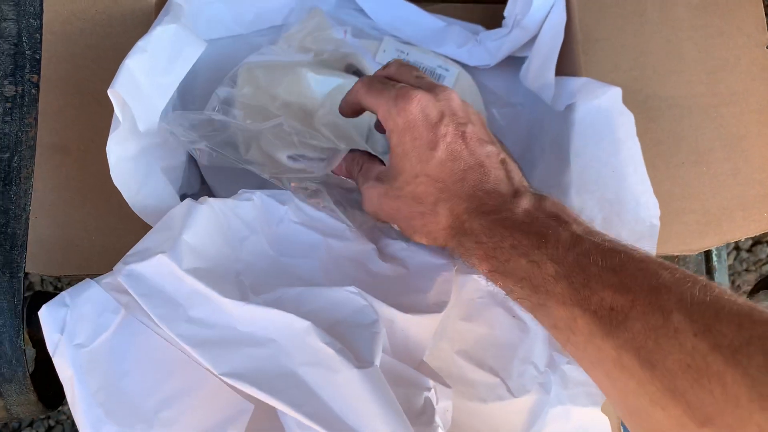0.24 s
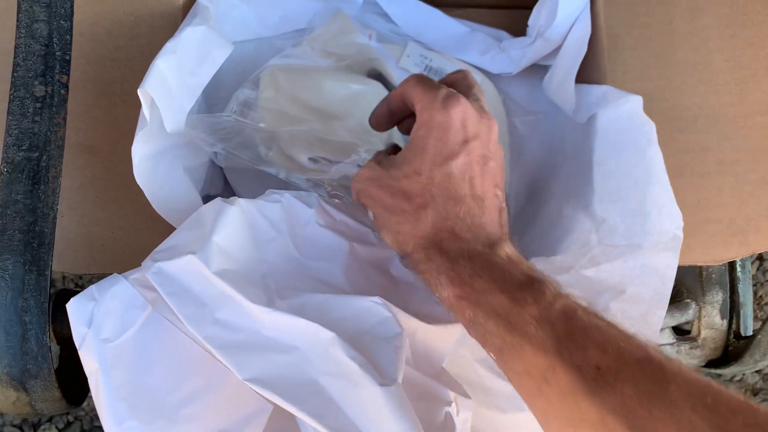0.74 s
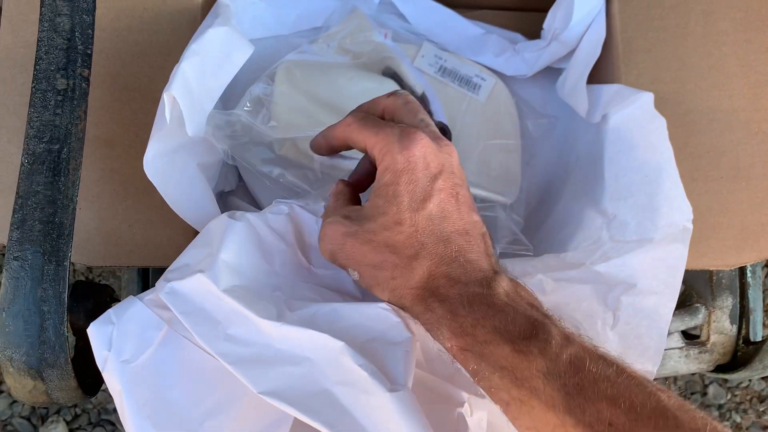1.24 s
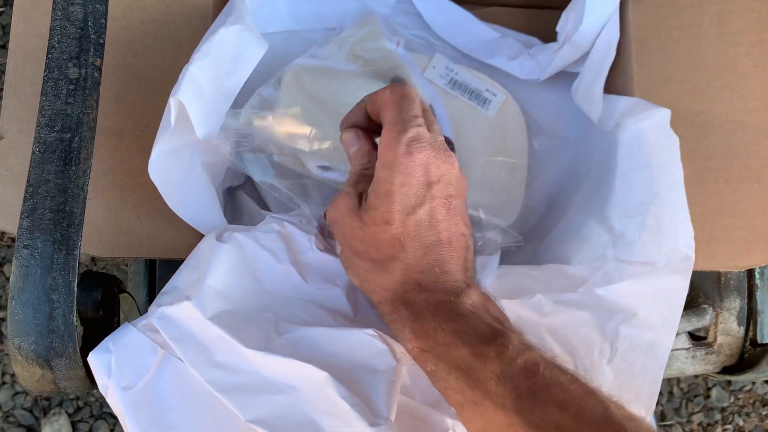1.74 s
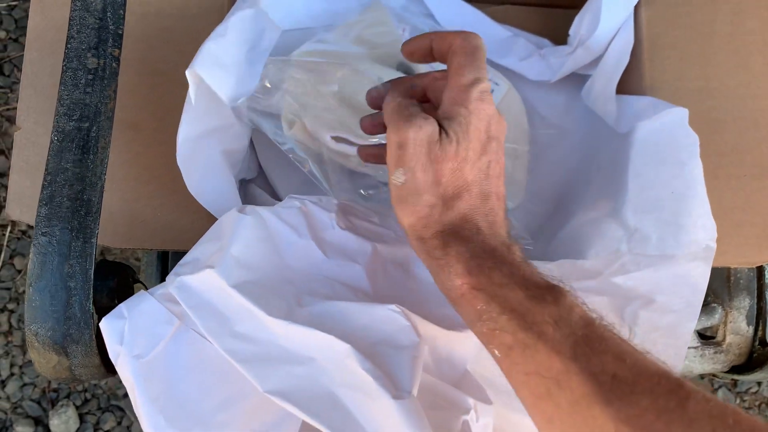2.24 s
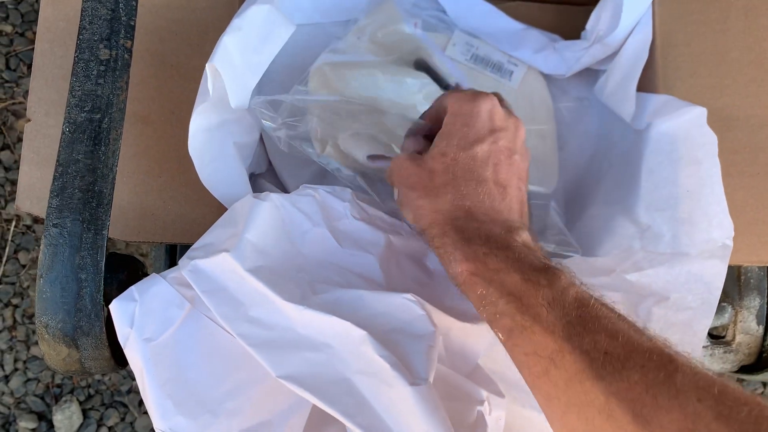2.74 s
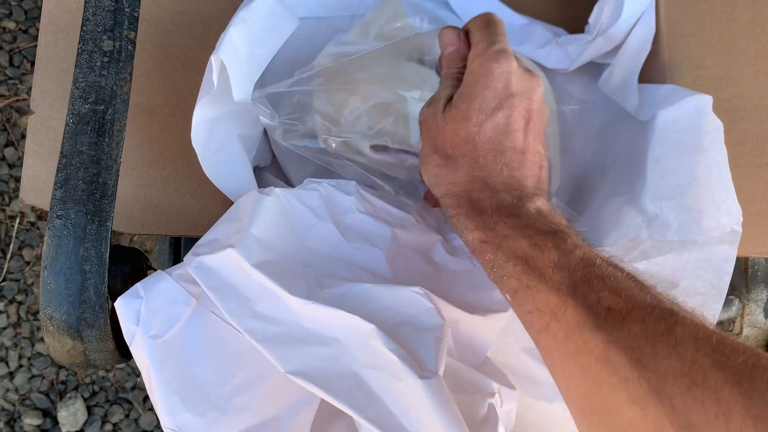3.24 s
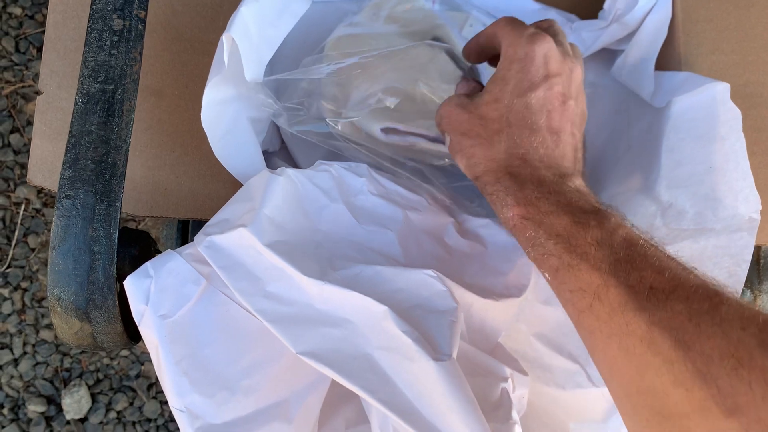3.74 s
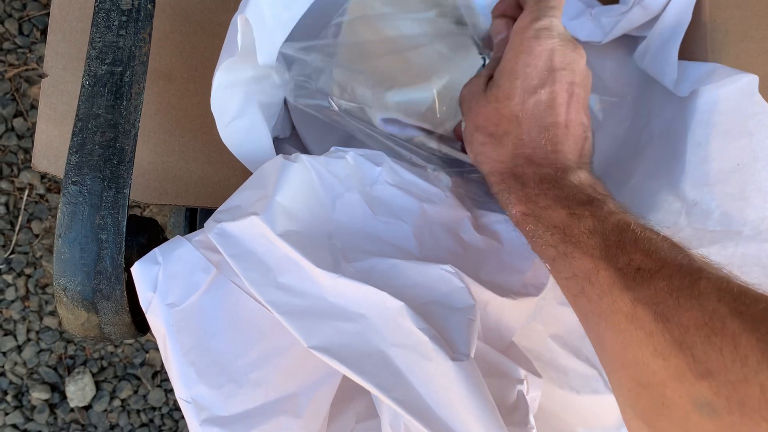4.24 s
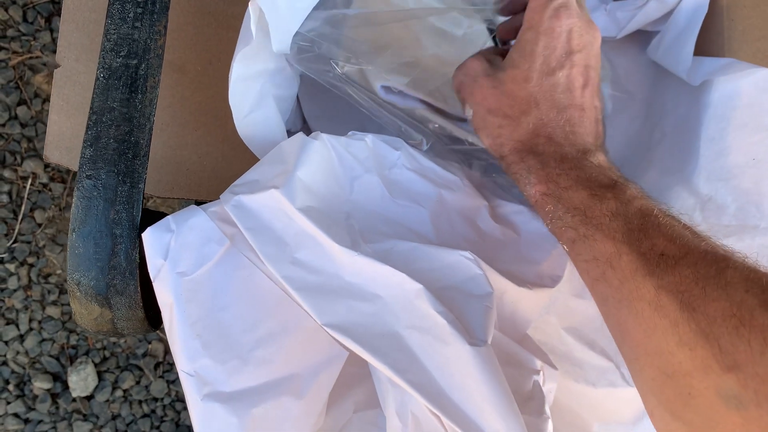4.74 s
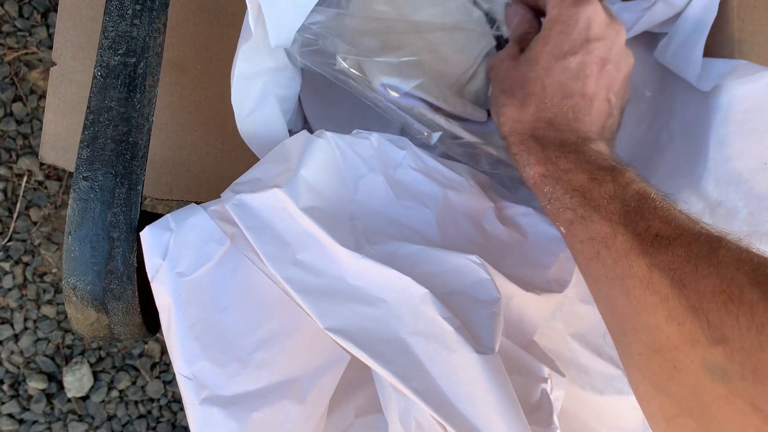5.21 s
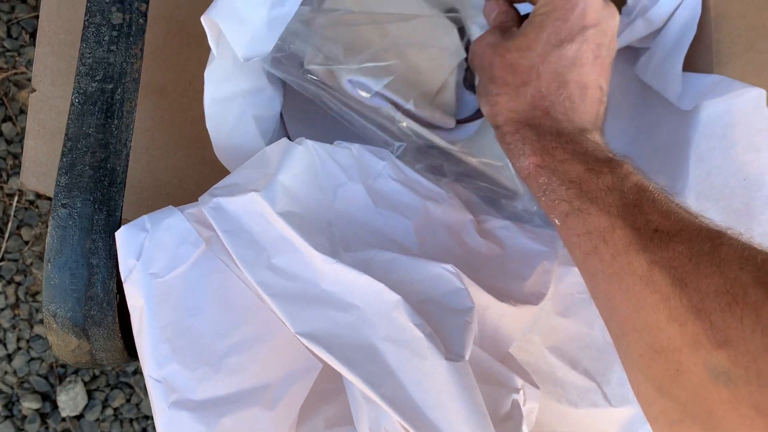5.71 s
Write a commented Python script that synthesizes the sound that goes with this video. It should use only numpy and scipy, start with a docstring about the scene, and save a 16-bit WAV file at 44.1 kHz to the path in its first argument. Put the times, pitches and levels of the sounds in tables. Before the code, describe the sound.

Close stereo sound of a hand handling a thin plastic bag nested in tissue paper inside a cardboard box. Sparse sharp snaps come first, then dense crackling bursts near 1.6, 2.8 and 4.1 seconds, with fine crinkles between. Soft box bumps gather around 2 seconds. Later, paper rubs and tiny film pops join thinner snaps. Faint outdoor air and low rumble lie beneath.

```python
"""A hand rummages in a cardboard box outdoors, over a faint rumble and hiss of air (shaped noise).
A few snaps of a thin plastic bag in tissue paper come first: each is a short grain of coloured noise.
Dense snaps and running slips follow near 1.6, 2.8 and 4.1 s, with tiny crinkles of film and paper between.
Soft box bumps (short low swings) gather near 2 s, as the bag slides over the tissue with an even hiss.
After 4.3 s come most of the paper rubs (noise at a falling pitch) and film pops (tiny fading tones)."""
import sys
import numpy as np
from scipy import signal
from scipy.fft import rfft, irfft, next_fast_len
from scipy.io import wavfile
from scipy.ndimage import map_coordinates

SR = 44100
rng = np.random.default_rng(int(sys.argv[2]) if len(sys.argv) > 2 else 0)


def persist_wave(psi):
    """Save psi, clipped to +-1, as 16-bit WAV."""
    counts = np.round(np.clip(psi, -1, 1) * 32767).astype(np.int16)
    wavfile.write(sys.argv[1], SR, np.atleast_2d(counts).T)


N = 263277
TIME = np.arange(N) / SR
PADDED = next_fast_len(N + 8192, real=True)  # room for filters to ring out
GRAIN = 1024  # samples in one crease sound


def from_db(db):
    """Turn decibels into gain."""
    return 10 ** (np.asarray(db) / 20)


def rms_one(x):
    """Scale each row to an average power of 1."""
    power = np.mean(x ** 2, axis=-1, keepdims=True)
    return x / np.sqrt(power + 1e-20)


def in_time(rows, when=TIME):
    """Read each column of a time table at the given times, joining its points by straight lines."""
    s, *columns = np.transpose(rows)
    return [np.interp(when, s, column) for column in columns]


def slow_chance(per_s):
    """Draw random values at a steady rate and join them by straight lines."""
    return np.interp(TIME * per_s, np.arange(GRAIN), rng.standard_normal(GRAIN))


def frequencies(size):
    """List the frequencies of a transform in Hz, none below 1."""
    return np.maximum(np.fft.rfftfreq(size, 1 / SR), 1)


def over_hz(points, size):
    """Join a frequency table by straight lines on a log-frequency axis."""
    hz, value = np.transpose(points)
    return np.interp(np.log(frequencies(size)), np.log(hz), value)


# how alike left and right are: (frequency [Hz], likeness [0 to 1])
LIKENESS = [(60, .92), (200, .98), (700, .94), (1500, .84), (2500, .72), (4000, .4), (7000, .4),
            (9000, .82), (15000, .82)]


def vibration(noise, gain, size):
    """Colour two noises into a stereo pair, with minimum phase so that nothing sounds early."""
    cepstrum = irfft(np.log(gain + 1e-9), size)[..., :size // 2]
    cepstrum[..., 1:] *= 2
    colour = np.exp(rfft(cepstrum, size))
    alike = np.clip(over_hz(LIKENESS, size), 0, 1)
    shared, apart = rfft(noise, size)
    shared = np.sqrt((1 + alike) / 2) * shared
    apart = np.sqrt((1 - alike) / 2) * apart
    return irfft(np.array([shared + apart, shared - apart]) * colour, size)


def hiss(level_db, spectrum):
    """Make smooth stereo noise of one colour that follows a level."""
    noise = rng.standard_normal((2, N)) * from_db(level_db)
    gain = rms_one(from_db(over_hz(spectrum, PADDED)))
    return vibration(noise, gain, PADDED)[:, :N]


def fold_resonances(count, order=44):
    """Give every fold its own random peaks and dips in dB, closer together in the bass."""
    place = np.sqrt(np.linspace(0, 1, GRAIN // 2 + 1)) * (order - 1)
    tents = np.maximum(1 - abs(place - np.arange(order)[:, None]), 0)
    return rng.standard_normal((count, order)) @ tents


# pinches and tugs of the fingers: (start [s], end [s], crinkling film level [dB],
# tissue paper level [dB], lesser snaps level [dB])
PULLS = [(0.037, 0.068, -42.5, -45.5, -39), (0.294, 0.385, -43.5, -47.5, -37),
         (0.456, 0.483, -40.5, -43, -39.5), (1.272, 1.352, -45, -48, -36), (1.599, 1.672, -38.5, -37, -33),
         (1.691, 1.825, -37, -40, -31), (1.928, 2.05, -40.5, -43.5, -43), (2.387, 2.494, -47, -49, -45),
         (2.738, 2.764, -37, -40, -43), (2.769, 2.851, -40, -34, -35), (2.86, 2.909, -41, -41, -40),
         (3.101, 3.167, -43.5, -43.5, -37), (3.268, 3.311, -41, -41, -33), (3.99, 4.03, -42, -45.5, -45),
         (4.041, 4.106, -29.5, -39, -30), (4.124, 4.248, -35, -40.5, -34.5),
         (4.403, 4.514, -42, -44.5, -39), (5.052, 5.138, -45, -49.5, -40), (5.295, 5.36, -42.5, -45.5, -37),
         (5.525, 5.62, -41, -46, -35)]
# effort of the hand holding the bag between pulls: (time [s], crinkling film level [dB])
HOLD = [(0, -48), (0.45, -48), (0.72, -56), (1.2, -54), (1.5, -49), (2.12, -45), (2.3, -50), (2.66, -51),
        (2.8, -43), (2.97, -44), (3.46, -56), (3.9, -52), (4.3, -44), (4.62, -45.5), (4.78, -56),
        (4.98, -53.5), (5.15, -45), (5.86, -44.5), (5.91, -54.5), (5.97, -43)]
ATTACK_S, RELEASE_S = 0.0088, .028  # time constants of a pull
USUAL_EFFORT_DB = -45
TISSUE_DB, TISSUE_FOLLOWS = -48.5, 0.78  # tissue at usual effort; dB per dB of effort
FAINT_SNAP_DB, SNAP_FOLLOWS = -36.5, 0.94  # lesser snaps at usual effort; dB per dB of effort


def handling():
    """Set the film, tissue and lesser-snap levels: pulls build, hold and relax above a steadier grip."""
    effort_db, = in_time(HOLD)
    above_db = effort_db - USUAL_EFFORT_DB
    tissue_db = TISSUE_DB + TISSUE_FOLLOWS * above_db
    snap_db = FAINT_SNAP_DB + SNAP_FOLLOWS * above_db
    level = from_db([effort_db, tissue_db, snap_db])
    for start, end, *db in PULLS:
        slack = np.maximum(start - TIME, 0) / ATTACK_S + np.maximum(TIME - end, 0) / RELEASE_S
        pull = from_db(db)[:, None] * np.exp(-np.minimum(slack, 20))
        level = np.maximum(level, pull)
    return 20 * np.log10(level)


# how the grip colours the creases, as taut film rings and wide loose folds sound hollow:
# (time [s], ring level [dB], hollow level [dB])
GRIP = [(1.3, 4.5, -5), (1.6, 2.5, 1.5), (1.78, -3, 2), (2.0, 5, 5), (2.3, -2, -9), (2.82, -6.5, -9),
        (3.2, -0.5, -6.5), (3.6, 5, -0.5), (4.15, 2, -2.5), (5.7, 3.5, -4.5)]
RING_HZ, HOLLOW_HZ, WIDTH_OCTAVES = 2520, 312, 0.65
TAUT_SHORTENS = .35  # taut film snaps more crisply: dB of ringing time lost per dB of ring
FOLD_S, FOLD_COLOUR_DB = .035, 2.8  # creases in one such time slot share a fold and its colour
TAIL_T60_S = .016  # the sheet shivers on after each crack


def creases(s, crack_db, body_db, film, sheet, colour_db, rise_s, t60, t60_spread_db, tail_db):
    """Each buckling crease is a sharp crack and a shiver of the sheet, in one short grain of noise."""
    count, age = len(s), np.arange(GRAIN) / SR
    folds = fold_resonances(int(N / SR / FOLD_S) + 2)
    shared_db = FOLD_COLOUR_DB * folds[(s / FOLD_S).astype(int)]
    own_db = colour_db * fold_resonances(count) + shared_db
    crack = from_db(crack_db)[:, None] * rms_one(from_db(over_hz(film, GRAIN) + own_db))
    body = from_db(body_db)[:, None] * rms_one(from_db(over_hz(sheet, GRAIN) + own_db))

    # the grip raises or lowers two broad bands
    ring, hollow = (np.exp(-.5 * (np.log2(frequencies(GRAIN) / hz) / WIDTH_OCTAVES) ** 2)
                    for hz in (RING_HZ, HOLLOW_HZ))
    ring_db, hollow_db = in_time(GRIP, s[:, None])
    gain = np.hypot(crack, body) * from_db(ring_db * ring + hollow_db * hollow)

    # a quick rise, a short fade and a weaker, fixed tail
    spread_db = t60_spread_db * rng.uniform(-0.032, 1, (count, 1))
    life = t60 * from_db(spread_db - TAUT_SHORTENS * ring_db)
    fade = 1000 ** (-age / life) + from_db(tail_db) * 1000 ** (-age / TAIL_T60_S)
    shape = rms_one((1 - np.exp(-age / rise_s)) * fade)
    shape *= np.sqrt(.004 * SR / GRAIN)  # the energy of 4 ms of steady noise
    grains = vibration(rng.standard_normal((2, count, GRAIN)) * shape, gain, GRAIN)

    out = np.zeros((2, N + GRAIN))
    for k, at in enumerate(np.clip((s * SR).astype(int), 0, N - 1)):
        out[:, at:at + GRAIN] += grains[:, k]
    return out[:, :N]


# creases that snap in the bag at set times, loud and faint, before trims and grip:
# (time [s], crack level [dB], level of the sheet's body [dB])
SNAPS = [(0.0276, -19, -38.5), (0.183, -37, -41.5), (0.266, -25, -40), (0.3615, -25.5, -40),
         (0.3789, -38, -48.5), (0.4574, -30.5, -40), (0.472, -37, -48), (0.5, -44, -47),
         (0.558, -35.5, -60), (0.8524, -36, -50.5), (0.984, -30.5, -58), (1.2653, -27.5, -47),
         (1.282, -30, -51), (1.3263, -29.5, -40), (1.414, -31.5, -40.5), (1.5681, -21.5, -40),
         (1.573, -22.5, -35.5), (1.6, -15, -34), (1.6177, -28, -34.5), (1.6411, -22, -28.5),
         (1.6749, -21.5, -46), (1.686, -22, -47), (1.697, -23, -42), (1.7034, -20, -39),
         (1.711, -17.5, -37), (1.7207, -21, -31), (1.7302, -20.5, -36), (1.7411, -19, -32),
         (1.7478, -19, -36), (1.7638, -18.5, -35), (1.8125, -19.5, -32), (1.817, -24.5, -27),
         (1.831, -24, -32), (1.849, -23, -28.5), (1.8733, -22.5, -34), (1.936, -29, -39.5),
         (1.963, -26.5, -37), (2.141, -40, -45), (2.221, -30, -54), (2.2467, -28, -41), (2.3445, -31, -39),
         (2.393, -32.5, -39.5), (2.4671, -26.5, -38), (2.483, -31.5, -35.5), (2.612, -41.5, -47),
         (2.738, -26.5, -35), (2.7733, -17.5, -22), (2.7828, -24, -26), (2.7882, -21, -21.5),
         (2.7975, -15.5, -29), (2.8351, -14.5, -25.5), (2.8635, -19, -28.5), (2.8735, -23, -37),
         (2.8811, -25, -29.5), (2.9, -24.5, -34), (2.91, -30.5, -33), (2.9324, -19.5, -28),
         (2.9886, -28, -33), (3.09, -31, -41), (3.112, -25.5, -34.5), (3.1551, -26, -48.5),
         (3.1771, -27, -51), (3.2783, -21.5, -39), (3.3112, -30, -52), (3.5397, -35.5, -39),
         (3.6258, -35.5, -40), (3.6791, -36, -54), (3.7272, -34.5, -39), (3.9868, -28.5, -32.5),
         (4.034, -21, -30), (4.069, -17, -36), (4.0969, -23, -27), (4.103, -23, -22.5),
         (4.1336, -19, -22.5), (4.144, -22.5, -25.5), (4.1516, -21, -28), (4.1731, -22, -30.5),
         (4.187, -17.5, -27.5), (4.1969, -15.5, -25.5), (4.2107, -18.5, -28), (4.2186, -17.5, -33),
         (4.2352, -18, -27), (4.2417, -14, -27.5), (4.3146, -17.5, -29.5), (4.3192, -20.5, -32.5),
         (4.46, -22, -30), (4.495, -25, -32), (4.5261, -24.5, -33.5), (4.585, -21, -40.5),
         (4.685, -28, -39.5), (4.7684, -34, -55.5), (4.849, -33, -63), (4.878, -38, -46),
         (5.02, -34.5, -46.5), (5.0465, -25, -41), (5.0534, -25.5, -34.5), (5.0827, -31, -52),
         (5.1167, -23, -41), (5.176, -31, -54), (5.214, -27, -52), (5.322, -28.5, -41), (5.337, -34, -32),
         (5.3563, -32, -37), (5.4644, -26, -51), (5.4819, -21.5, -46), (5.58, -29.5, -43),
         (5.6281, -31.5, -41), (5.743, -27.5, -43), (5.7524, -27, -39), (5.784, -28.5, -35.5),
         (5.9602, -33, -44)]
# colour of the crack: (frequency [Hz], relative level [dB])
FILM = [(700, -24), (1500, -26), (2500, -16), (3400, -7.5), (5500, -10.5), (7200, -5), (8500, 2),
        (11000, 0.5), (13300, 5), (15000, -6.5), (16000, -20)]
# colour of the sheet's body: (frequency [Hz], relative level [dB])
SHEET = [(150, -32), (320, 0.5), (480, -7), (800, 1.5), (1200, -1.5), (1800, -6), (2500, -9), (4000, -6.5),
         (8000, -13)]


def bag_snaps(crack_db=0.0, body_db=2.5, rebound_s=0.0033, rebound_db=-12):
    """Each crease flips over, and a weaker neighbour gives way a moment later."""
    s, crack, body = np.transpose(SNAPS)
    later, weaker = rng.random((len(s), 2)).T
    weaker_db = rebound_db * (.5 + weaker)
    s = np.r_[s, s + rebound_s * (.2 + later)]
    crack = np.r_[crack, crack + weaker_db]
    body = np.r_[body, body + weaker_db]
    return creases(s, crack + crack_db, body + body_db, FILM, SHEET,
                   colour_db=2.4, rise_s=0.0009, t60=0.006, t60_spread_db=3, tail_db=-22)


# creases that run along the film in quick jerks, before trims and grip:
# (start [s], end [s], crack level [dB], level of the sheet's body [dB])
SLIPS = [(1.604, 1.609, -15, -38), (1.6099, 1.615, -13.5, -32), (1.644, 1.659, -14.5, -30),
         (1.661, 1.672, -19.5, -33), (1.776, 1.802, -24, -29.5), (2.766, 2.778, -21.5, -21),
         (2.8139, 2.824, -15.5, -22), (2.8435, 2.847, -12, -28), (2.851, 2.856, -12.5, -28),
         (4.034, 4.044, -19, -28.5), (4.049, 4.068, -19, -24), (4.106, 4.123, -18, -25)]


def bag_slips(jerks_per_s=540, uneven_db=2.0, gain_db=-4.0):
    """A running crease sticks and slips at a rate of hundreds of jerks a second."""
    jerks = [(s, crack, body) for start, end, crack, body in SLIPS
             for s in np.arange(start, end, 1 / jerks_per_s)]
    s, crack, body = np.transpose(jerks)
    jitter, force = rng.standard_normal((len(s), 2)).T
    force_db = gain_db + uneven_db * force
    return creases(s + 0.21 * jitter / jerks_per_s, crack + force_db, body + force_db, FILM, SHEET,
                   colour_db=2.0, rise_s=0.0003, t60=0.0045, t60_spread_db=0, tail_db=-18)


def lesser_snaps(level_db, per_s=19, rate_follows=.85, body_db=-46, body_follows=0.66, uneven_db=-0.5):
    """Strain builds faster under a hard pull; each unit of it lets one crease go, at a random point."""
    above_db = level_db - FAINT_SNAP_DB
    strain = np.cumsum(per_s * from_db(rate_follows * above_db)) / SR
    chance = rng.random((GRAIN, 3))[:int(strain[-1])]
    at = np.searchsorted(strain, np.arange(len(chance)) + chance[:, 0])
    crack_off, body_off = uneven_db * (2 * chance[:, 1:].T - 1)
    crack = level_db[at] + crack_off
    body = body_db + body_follows * above_db[at] + body_off
    return creases(at / SR, crack, body, FILM, SHEET,
                   colour_db=2.5, rise_s=0.0008, t60=0.006, t60_spread_db=3, tail_db=-22)


# colour of the tiny film creases and of film sliding: (frequency [Hz], relative level [dB])
FINE_FILM = [(700, -41), (1500, -8), (2600, 1), (4000, 0.5), (6000, -0.5), (7500, 0.5), (8500, 3),
             (11000, -0.5), (13500, 1), (15000, -26), (16000, -1.5)]
# colour of the tissue paper: (frequency [Hz], relative level [dB])
TISSUE = [(150, -10), (320, 0.5), (500, -1), (900, -2.5), (1300, -3), (1800, -8), (2500, -12),
          (4000, -14.5), (8000, -55)]


def crinkling(film_db, tissue_db, calm_per_s=250, spread_db=4.5, film_gain_db=1.0,
              tissue_gain_db=-2.0, film_rub_db=-6.0, tissue_rub_db=-2.5):
    """Harder handling sets off more tiny creases, in flurries, most of them faint; sheets also rub."""
    per_s = calm_per_s * from_db(.35 * (film_db - np.median(film_db)))
    flurry = from_db(7 * slow_chance(45))
    at = np.flatnonzero(rng.random(N) < per_s * flurry / flurry.mean() / SR)
    size = from_db(spread_db * np.minimum(rng.exponential(1, (len(at), 2)), 3)).T
    # the higher the rate set by the handling, the weaker each crease
    size_db = 20 * np.log10(rms_one(size) / np.sqrt(.004 * per_s[at]))
    film_tick_db = film_db[at] + film_gain_db + size_db[0]
    tissue_tick_db = tissue_db[at] + tissue_gain_db + size_db[1]
    ticks = creases(at / SR, film_tick_db, tissue_tick_db, FINE_FILM, TISSUE,
                    colour_db=3.2, rise_s=0.00094, t60=0.01, t60_spread_db=5.0, tail_db=-18)
    film_rub = hiss(film_db + film_rub_db, FINE_FILM)
    tissue_rub = hiss(tissue_db + tissue_rub_db, TISSUE)
    return ticks + film_rub + tissue_rub


# taut blisters of film that pop through: (time [s], starting level [dB], pitch [Hz])
POPS = [(3.728, -27, 950), (4.3535, -24.5, 985), (4.3629, -31.5, 1100), (4.586, -23, 2170),
        (4.686, -26.5, 3340), (5.2144, -24.5, 2156), (5.4656, -16.5, 3160), (5.648, -25, 1870),
        (5.784, -25.5, 2130)]


def bag_pops(gain_db=0.0, ring_cycles=15):
    """A blister turns inside out and rings for a few cycles at a brief pitch."""
    out = np.zeros(N)
    for s, peak_db, hz in POPS:
        span = (TIME >= s) & (TIME < s + .03)
        cycles = (TIME[span] - s) * hz
        fade = np.exp(-np.log(1000) * cycles / ring_cycles)
        out[span] += from_db(peak_db + gain_db) * fade * np.sin(2 * np.pi * cycles)
    return out


# a fingertip slides over the paper: (start [s], end [s], level [dB], first pitch [Hz], last pitch [Hz])
RUBS = [(0.6, 0.62, -44, 905, 710), (4.391, 4.452, -38, 611, 345), (4.455, 4.488, -55, 1050, 646),
        (5.064, 5.101, -42, 800, 481), (5.254, 5.315, -51.5, 1210, 518), (5.41, 5.445, -47.5, 750, 450)]


def finger_rubs(gain_db=0.0, width_hz=110):
    """Friction drives one broad paper resonance, which sinks as the pocket under the finger widens."""
    out = np.zeros(N)
    slow_only = signal.butter(2, width_hz, fs=SR, output="sos")
    for start, end, db, first_hz, last_hz in RUBS:
        along = np.clip((TIME - start) / (end - start), 0, 1)
        phase = 2 * np.pi * np.cumsum(first_hz * (last_hz / first_hz) ** along) / SR
        friction = rms_one(signal.sosfilt(slow_only, rng.standard_normal((2, N))))
        note = friction[0] * np.cos(phase) + friction[1] * np.sin(phase)
        out += from_db(db + gain_db) * np.sin(np.pi * along) * note
    return out


# the bag slides smoothly over the tissue: (start [s], end [s], level [dB])
SLIDES = [(1.92, 2.132, -42), (4.372, 4.577, -39.5), (5.213, 5.45, -56)]


def bag_slides(gain_db=0.0):
    """Film gliding on paper gives an even hiss that swells and fades with its speed."""
    speed = np.zeros(N)
    for start, end, db in SLIDES:
        along = np.clip((TIME - start) / (end - start), 0, 1)
        speed += from_db(db) * np.sin(np.pi * along)
    return speed * hiss(gain_db, FINE_FILM)


# colour of the cardboard walls' echo: (frequency [Hz], relative level [dB])
BOX = [(150, 2), (250, 5), (340, 12), (490, 2), (690, 11), (1500, 5), (4000, 6), (15000, 0)]


def inside_box(x, wet_db=-15, t60=0.04, first_s=0.00356, size=8192):
    """The cardboard walls scatter each sound into a brief, hollow tail."""
    age = np.arange(size) / SR - first_s
    fade = (age > 0) * np.exp(-np.log(1000) * age / t60)
    echoes = rms_one(rng.standard_normal((2, size)) * fade) / np.sqrt(size)
    walls = vibration(echoes, rms_one(from_db(over_hz(BOX, size))), size)
    return x + from_db(wet_db) * signal.oaconvolve(x, walls, axes=1)[:, :N]


# nudges to the box and what lies in it, before gain and dulling:
# (time [s], level [dB], pitch [Hz])
BUMPS = [(0.772, -33.5, 87.6), (1.092, -31, 203), (1.094, -28.5, 72.5), (1.155, -33, 84.6),
         (1.893, -25.5, 212), (1.927, -32.5, 71.3), (1.992, -32.5, 94.1), (2.017, -28.5, 204),
         (2.036, -25.5, 119), (2.053, -26, 85.5), (2.101, -30.5, 171), (2.153, -33, 141),
         (2.786, -25.5, 100.7), (3.114, -32.5, 55.5), (3.178, -29.5, 61.4), (4.311, -30.5, 61.8),
         (4.485, -30, 64.7), (4.521, -31.5, 173), (4.528, -27.5, 94.5), (4.78, -36, 61.4),
         (5.357, -34, 59.7), (5.388, -34.5, 67.6), (5.508, -32.5, 74.8), (5.825, -33.5, 91.5),
         (5.934, -35.5, 55)]


def box_bumps(gain_db=4.5, swell_cycles=0.54, overtone=2.25, overtone_db=-12, soft_hz=330):
    """A soft push swings the cardboard a few cycles, with a weaker panel mode above; padding dulls it."""
    out = np.zeros(N)
    for s, peak_db, hz in BUMPS:
        span = (TIME >= s) & (TIME < s + .2)
        cycles = (TIME[span] - s) * hz
        swell = cycles / swell_cycles * np.exp(1 - cycles / swell_cycles)
        panel = from_db(overtone_db) * swell * np.sin(2 * np.pi * overtone * cycles)
        swing = np.sin(2 * np.pi * cycles) + panel
        out[span] += from_db(peak_db + gain_db) * swell * swing * rng.choice([-1, 1])
    return signal.sosfilt(signal.butter(3, soft_hz, fs=SR, output="sos"), out)


# low rumble of air and handling, before gain: (time [s], level [dB])
RUMBLE = [(0, -43.5), (.5, -45), (1.35, -40.5), (1.6, -42.5), (1.87, -45.5), (2.05, -38), (2.6, -43),
          (3.3, -42), (3.5, -51), (4.4, -44), (4.75, -53), (5.2, -44.5), (5.97, -48.5)]
# colour of the rumble: (frequency [Hz], relative level [dB])
LOW_AIR = [(20, -33), (35, -7), (55, 3), (85, -1), (130, -7.5), (200, -14), (320, -24.5), (700, -55),
           (2000, -57)]
# colour of the open air: (frequency [Hz], relative level [dB])
OUTDOORS = [(100, 4), (400, 10), (950, 16), (1800, 1), (4000, -16), (13500, -5), (16000, 0)]
OUTDOORS_DB = -62.5


def air(rumble_gain_db=-0.5, lumpy_db=5.0, lumps_per_s=25):
    """Noise makes a lumpy low rumble and the faint steady hiss of the open air."""
    rumble_db, = in_time(RUMBLE)
    lumps_db = lumpy_db * slow_chance(lumps_per_s)
    rumble = hiss(rumble_db + rumble_gain_db + lumps_db, LOW_AIR)
    return rumble + hiss(OUTDOORS_DB, OUTDOORS)


# the hand works its way from left to right: (time [s], lead of the left channel [ms])
LEFT_LEAD = [(0, 0.15), (1.7, 0.17), (2.85, 0.13), (3.3, 0.13), (5.3, 0.096)]


def microphone_pair(x, split_hz=7700, high_lag_ms=0.2905):
    """The lower range reaches the left first, by a changing lead; the top octave the right first."""
    hz = frequencies(PADDED)
    top = rfft(x, PADDED) / (1 + (split_hz / np.maximum(hz, 100)) ** 40)
    low = x - irfft(top, PADDED)[:, :N]
    lead_ms, = in_time(LEFT_LEAD)
    late_low = map_coordinates(low[1], [(TIME - lead_ms / 1000) * SR], order=3, mode="nearest")
    late_top = irfft(top[0] * np.exp(-2j * np.pi * hz * high_lag_ms / 1000), PADDED)[:N]
    right_top = x[1] - low[1]
    return np.array([low[0] + late_top, late_low + right_top])


def scene():
    """Put bag, tissue and box close under the microphones, in the open air."""
    film_db, tissue_db, snap_db = handling()
    bag = bag_snaps() + bag_slips() + lesser_snaps(snap_db) + bag_pops()
    sheets = bag + crinkling(film_db, tissue_db) + finger_rubs() + bag_slides()
    background = box_bumps() + air()
    return microphone_pair(inside_box(sheets) + background)


CUTOFF_HZ = 16000


def record(dry):
    """Round the highest peaks and cut the top of the treble."""
    rounded = 1.1 * np.tanh(dry / 1.1)
    return signal.sosfilt(signal.ellip(10, .1, 80, CUTOFF_HZ, fs=SR, output="sos"), rounded)


dry = scene()
out = record(dry)
persist_wave(out)
```